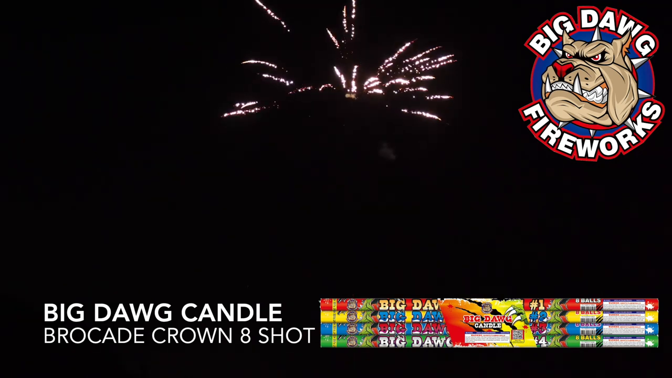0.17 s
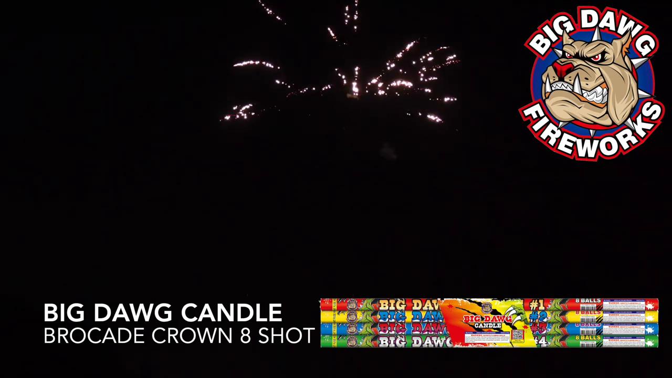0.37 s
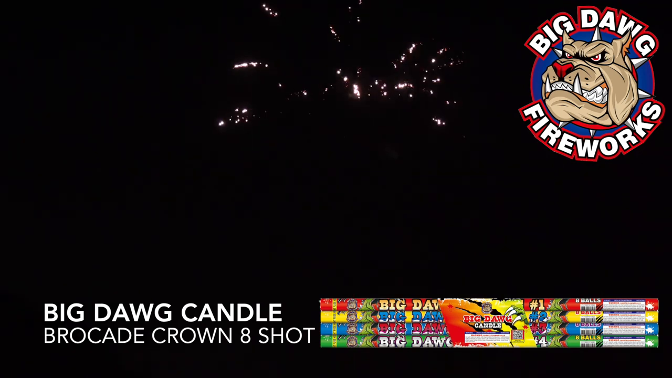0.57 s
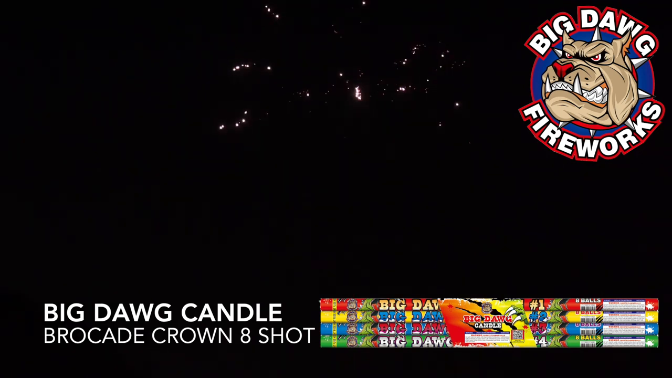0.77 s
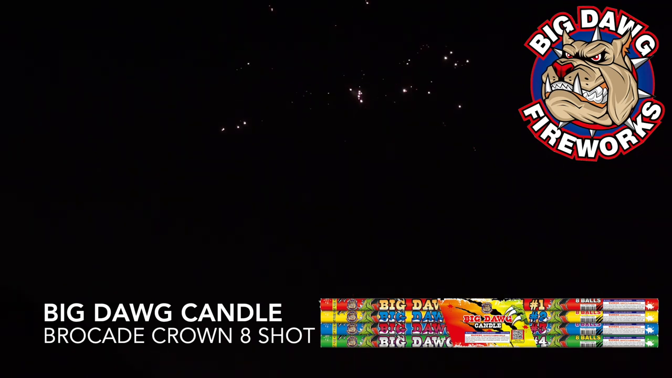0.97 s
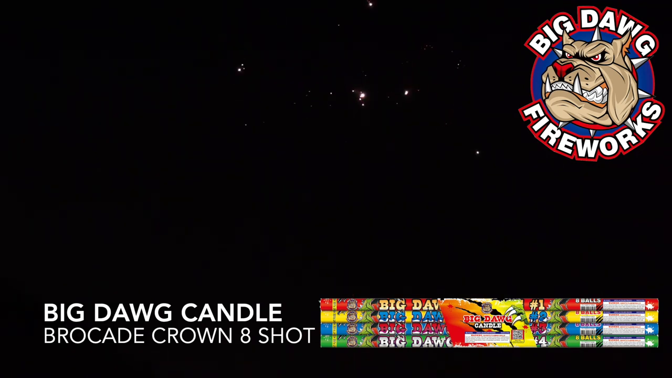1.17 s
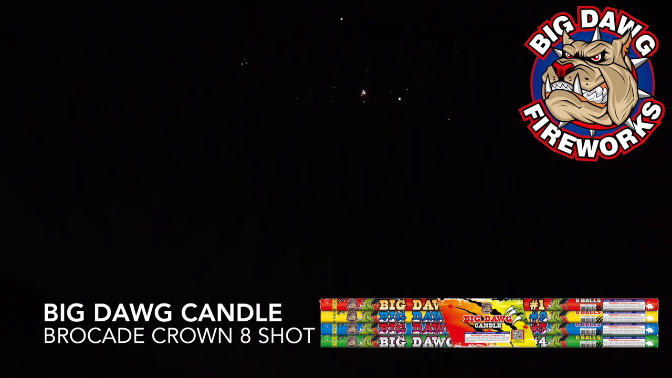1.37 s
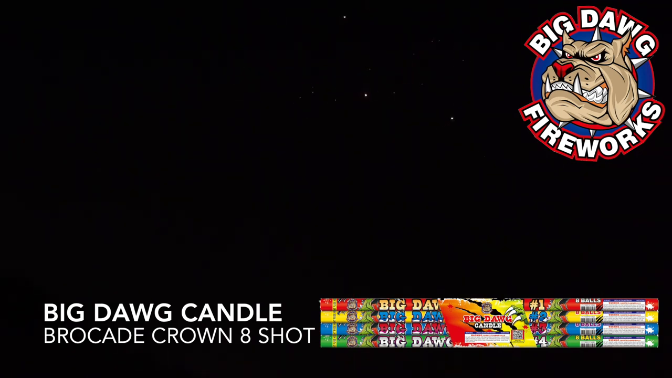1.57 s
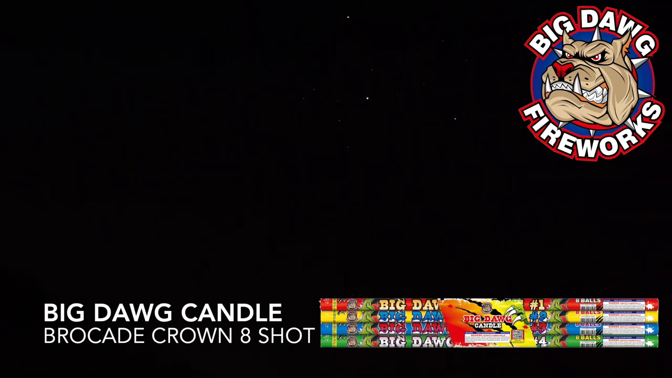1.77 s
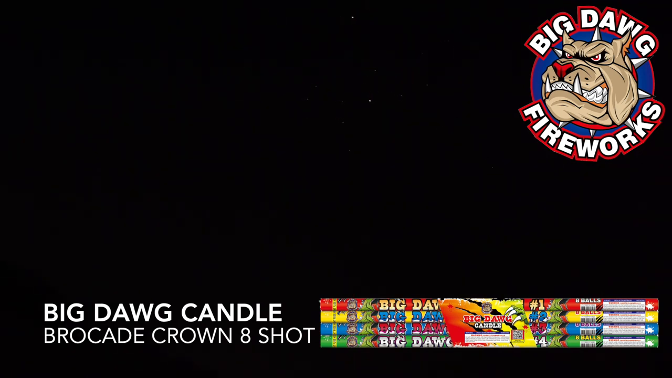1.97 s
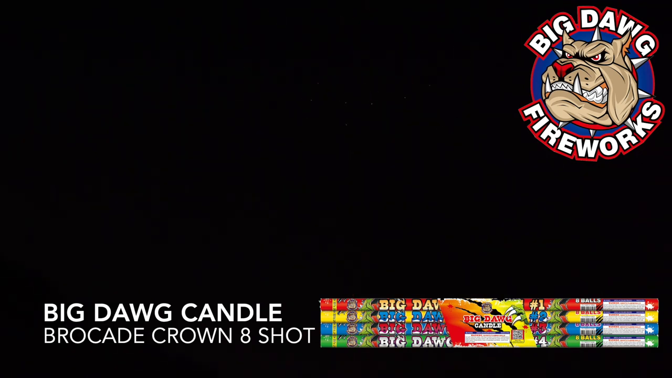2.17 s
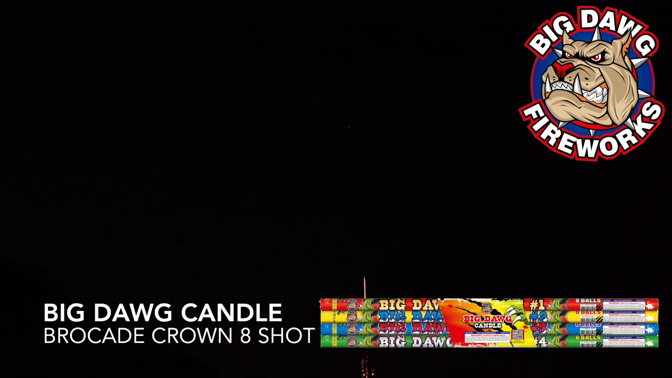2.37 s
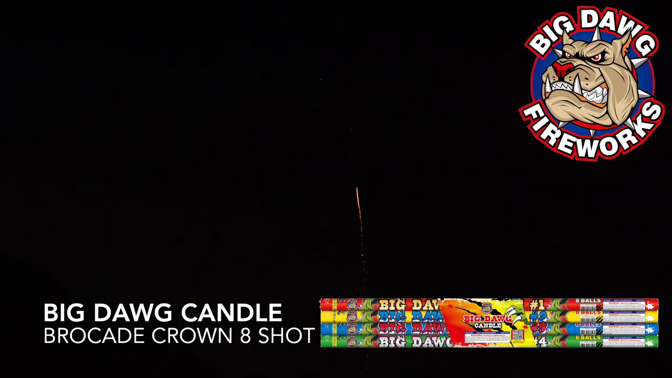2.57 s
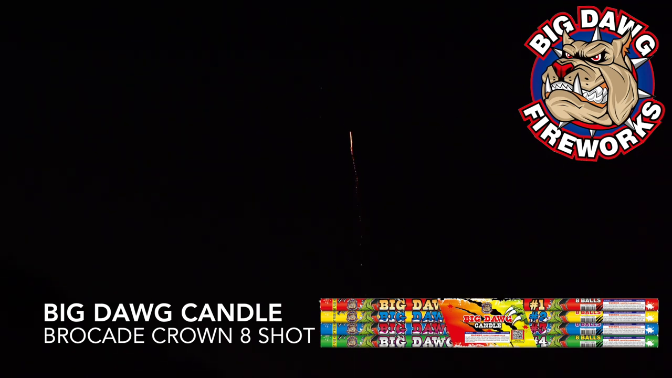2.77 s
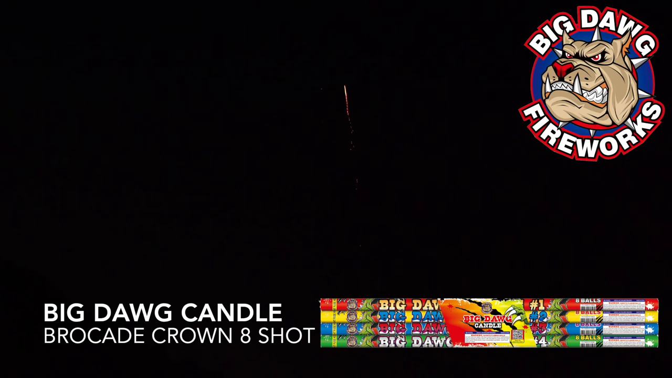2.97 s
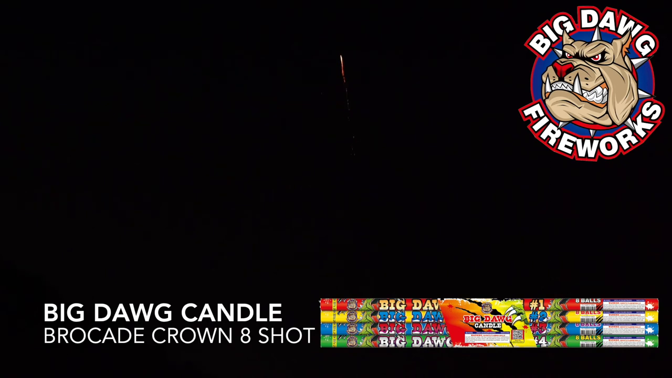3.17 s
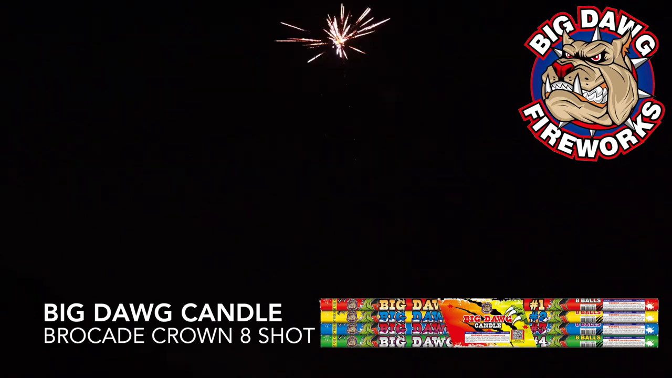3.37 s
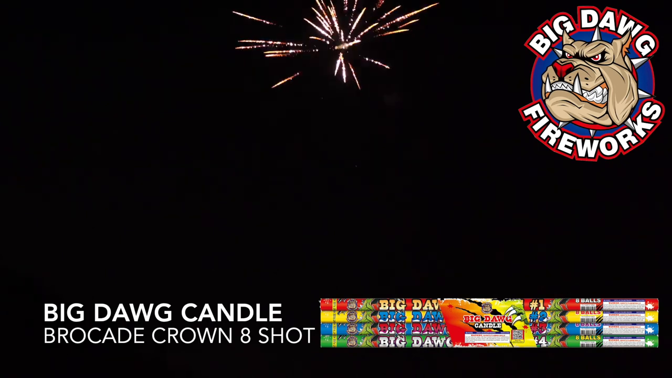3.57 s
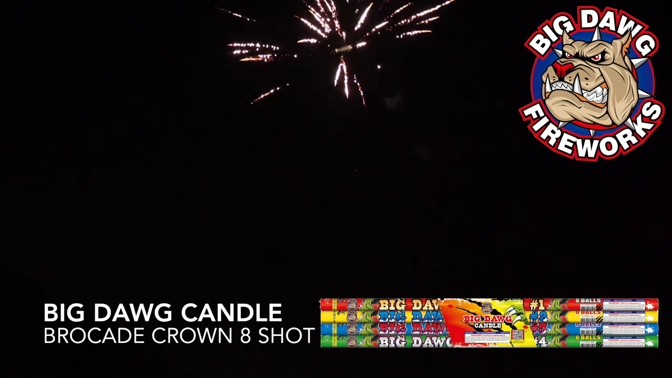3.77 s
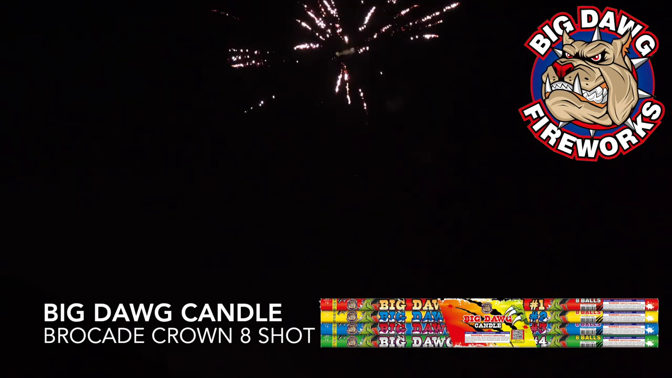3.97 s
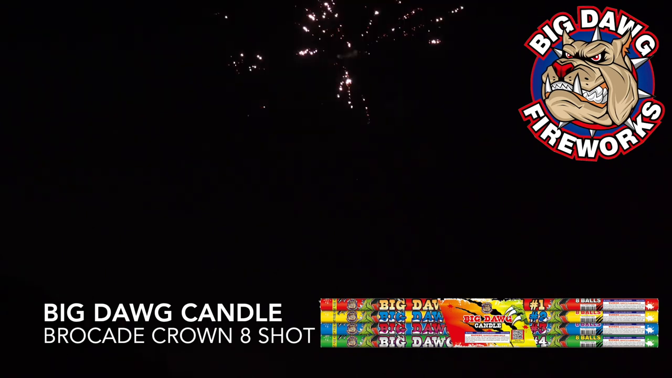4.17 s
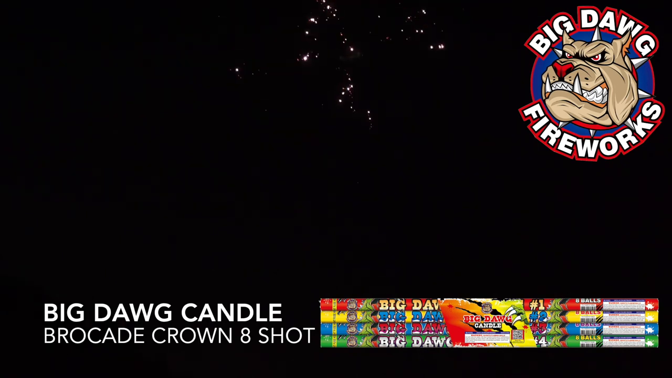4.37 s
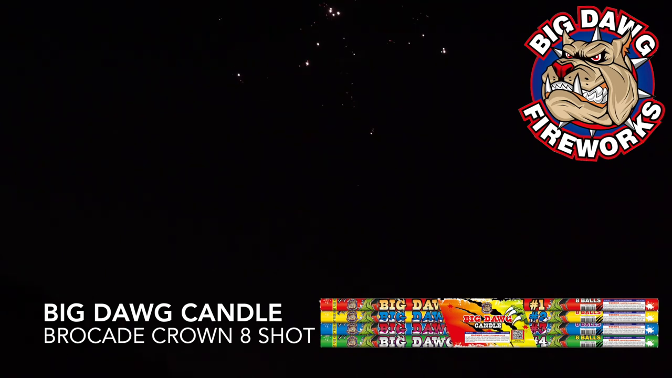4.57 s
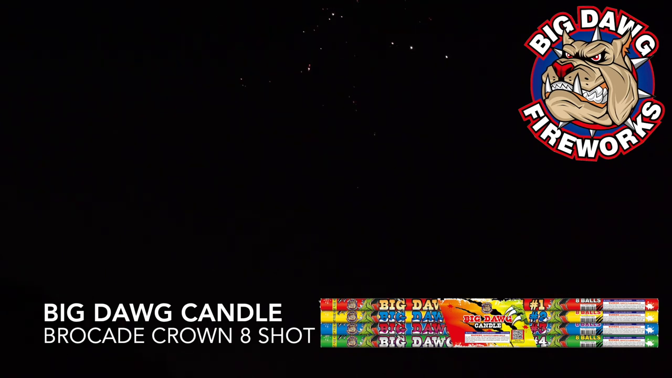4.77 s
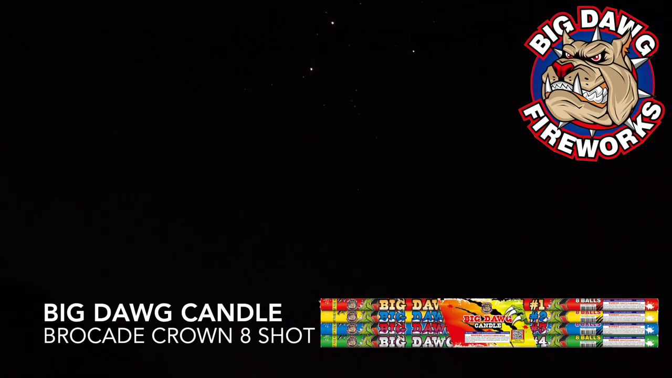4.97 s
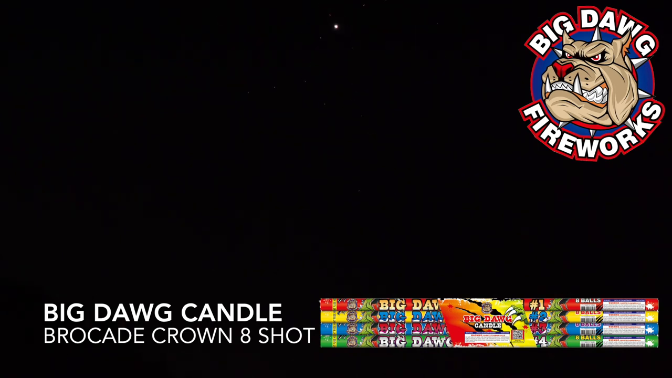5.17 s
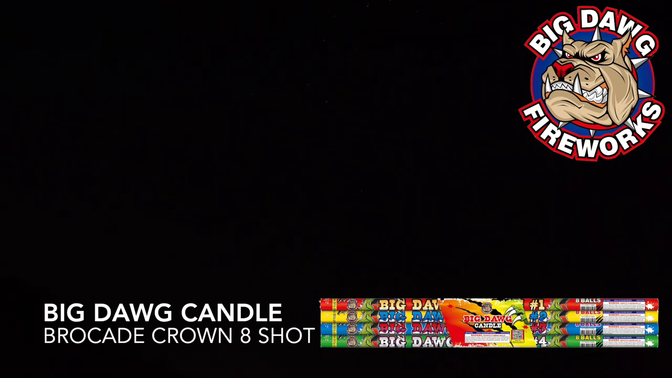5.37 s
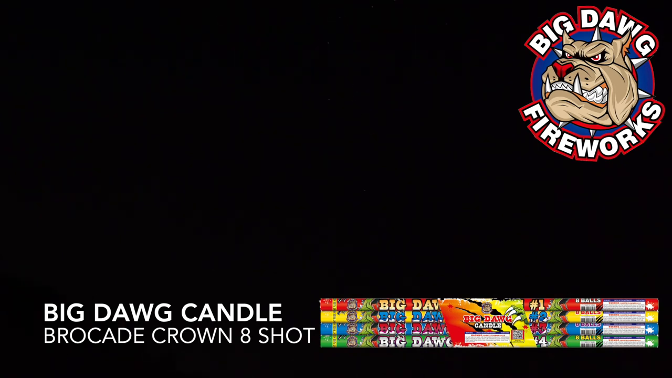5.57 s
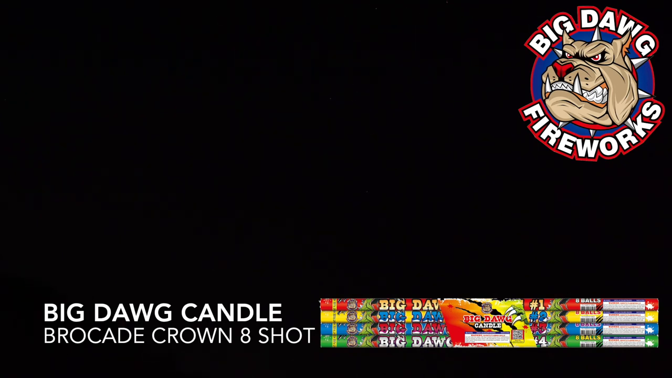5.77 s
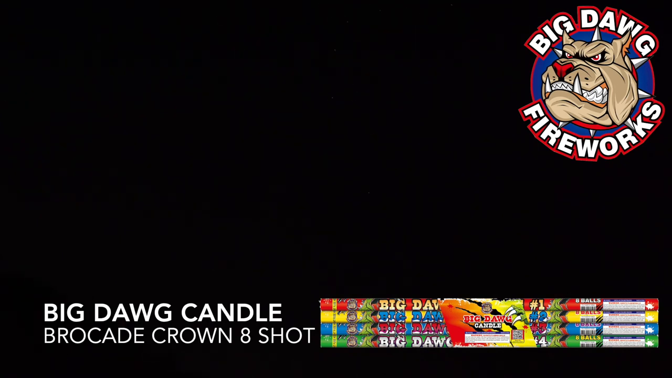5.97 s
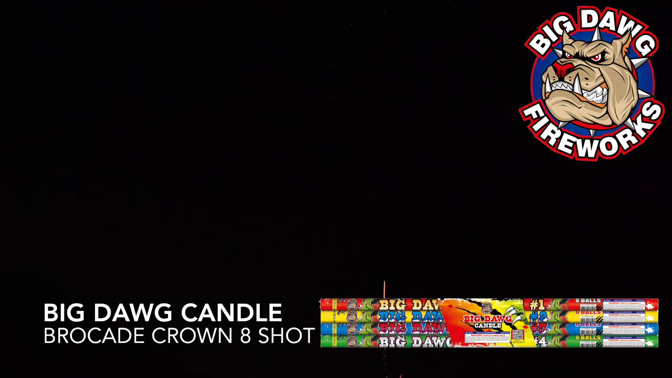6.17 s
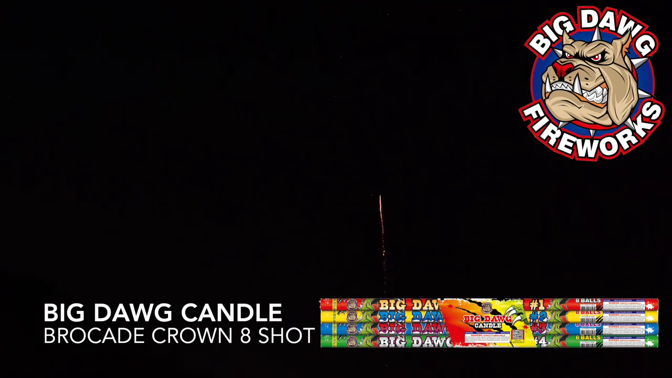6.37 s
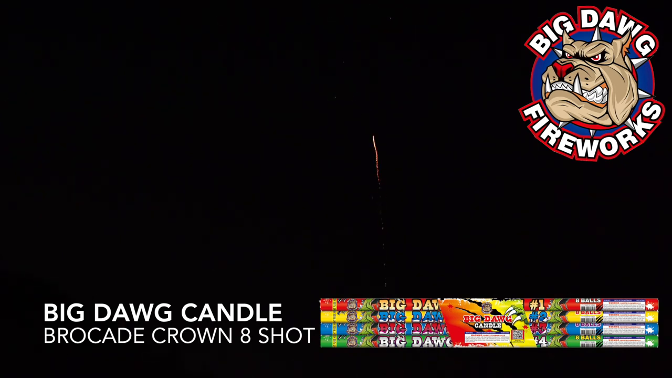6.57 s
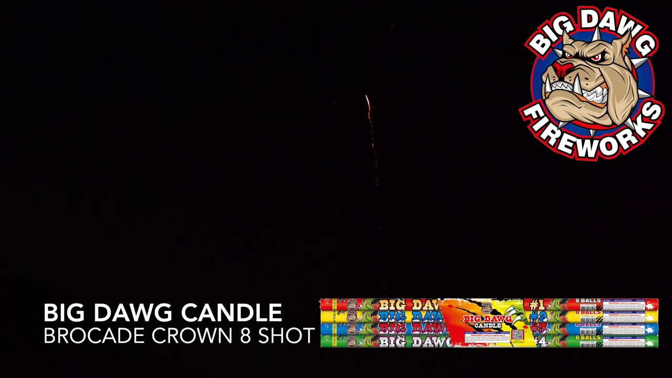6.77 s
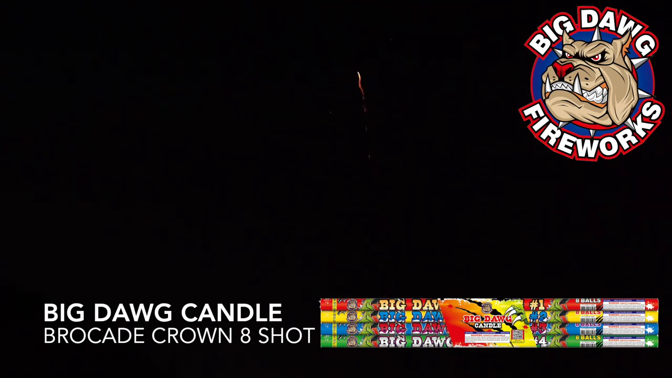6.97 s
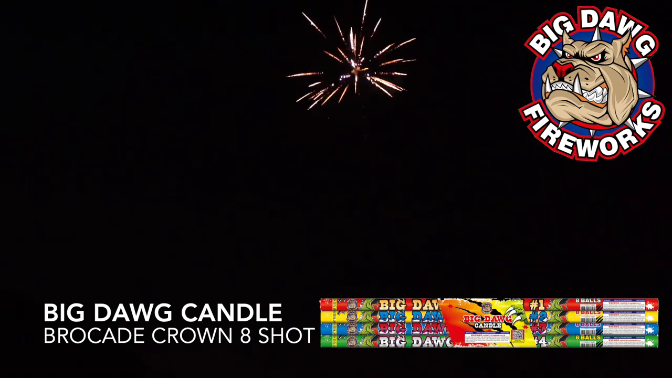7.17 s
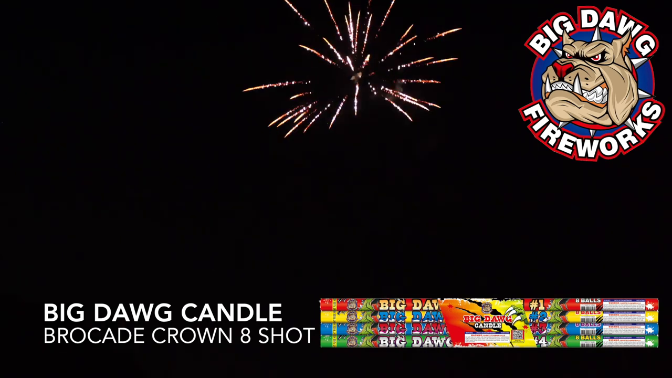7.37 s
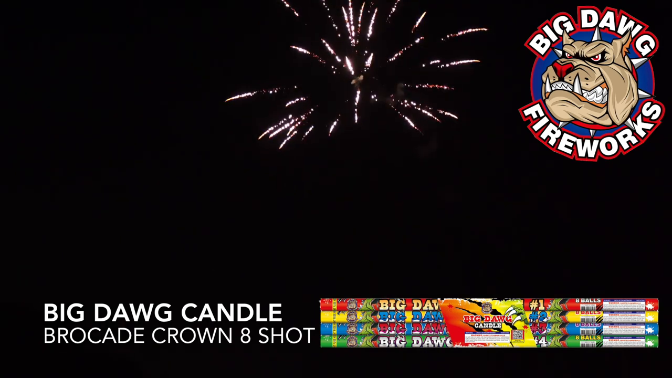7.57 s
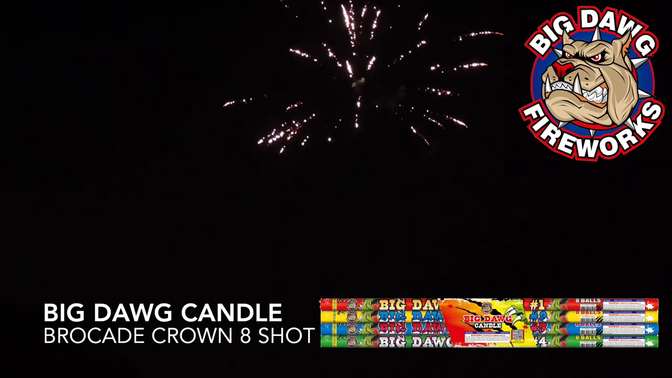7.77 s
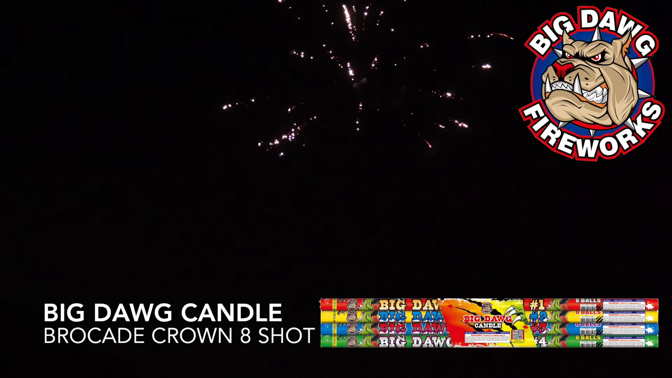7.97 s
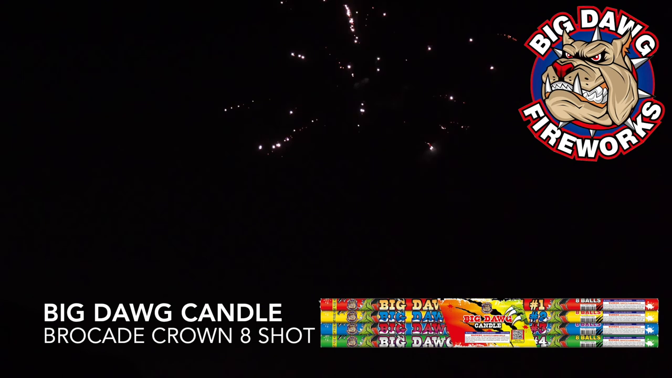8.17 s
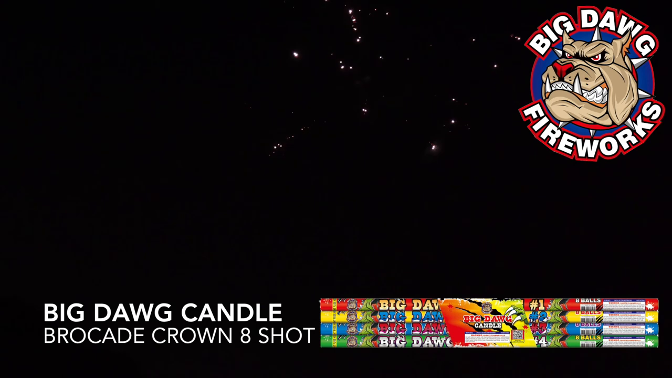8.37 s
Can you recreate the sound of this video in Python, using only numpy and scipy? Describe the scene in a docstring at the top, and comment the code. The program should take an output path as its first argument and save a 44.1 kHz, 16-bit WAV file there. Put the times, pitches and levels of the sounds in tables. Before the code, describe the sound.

At night in open country, a firework tube pops twice; loud overhead bangs crack, slap off walls and roll away through trees.

```python
"""Roman candle at night

Open country: the tube spits a shell with a sharp pop, and about a second later it bursts overhead.
Each blast is a short shock with added resonances; it slaps back from ground and buildings as duller copies,
then rolls back from the trees as a long noise hiss that dulls with distance. The loudest peaks overload.
Faint insects are throbbing noise bands and sliding tones over a steady hush; faint, late echoes of the
shots, short dull knocks and small crackles, are damped noise through resonances."""
import sys
import numpy as np
from scipy import signal
from scipy.fft import rfft, irfft, next_fast_len
from scipy.io import wavfile
from scipy.ndimage import uniform_filter1d

SR = 44100
rng = np.random.default_rng(int(sys.argv[2]) if len(sys.argv) > 2 else 0)


def store_pcm(level_fs):
    """Save levels as 16-bit WAV."""
    pcm = np.round(np.clip(level_fs, -1, 1) * 32767).astype(np.int16)
    wavfile.write(sys.argv[1], SR, np.atleast_2d(pcm).T)


N = 371763


def from_db(db):
    """Decibels to gain."""
    return 10 ** (np.asarray(db) / 20)


def at_hz(points, hz):
    """Read a spectrum on a log-frequency axis."""
    known_hz, values = np.transpose(points)
    return np.interp(np.log(np.maximum(hz, 1)), np.log(known_hz), values)


def panned(pan_db):
    """Left and right gains for a level difference; positive leans left."""
    return from_db(np.array([[0.5], [-0.5]]) * pan_db)


def butter(x, hz, kind, order=2):
    """Causal Butterworth filter."""
    sections = signal.butter(order, np.clip(hz, 10, SR * 0.49), kind, fs=SR, output="sos")
    return signal.sosfilt(sections, x)


def resonance(x, hz, width_hz):
    """Two-pole resonance with a gain of about 1 on top."""
    radius = np.exp(-np.pi * width_hz / SR)
    feedforward = np.array([1, 0, -1]) * (1 - radius ** 2) / 2
    feedback = [1, -2 * radius * np.cos(2 * np.pi * hz / SR), radius ** 2]
    return signal.lfilter(feedforward, feedback, x)


def add(out, s, sound):
    """Mix a sound in at a time in seconds, dropping what lies outside."""
    at = int(round(s * SR))
    first, last = max(at, 0), min(at + sound.shape[-1], N)
    if last > first:
        out[:, first:last] += sound[..., first - at:last - at]


def stereo(pair, likeness):
    """Turn two unrelated noises into left and right with a given likeness."""
    c = np.clip(likeness, -1, 1)
    middle = np.sqrt((1 + c) / 2) * pair[0]
    side = np.sqrt((1 - c) / 2) * pair[1]
    return middle + side * np.array([[1], [-1]])


def wander(size, rate_hz):
    """Random values of spread about 1, joined by straight lines."""
    steps = np.arange(size) / SR * rate_hz
    return np.interp(steps, np.arange(SR // 4), rng.standard_normal(SR // 4))


# Night air with an insect chorus near 8 kHz: pitch_hz, level_db_per_hz
NIGHT_AIR = [(25, -87), (100, -76.5), (250, -79.5), (420, -79), (700, -77), (1100, -81.5), (1600, -85.5),
             (3300, -94.5), (4200, -90), (5200, -99), (6800, -93), (8100, -86), (9600, -100), (15500, -102)]
# How alike left and right are: pitch_hz, likeness (1 = mono)
NIGHT_WIDTH = [(50, 0.075), (400, 0.031), (2000, 0.085), (8000, 0.34), (12000, 0.69)]


def night():
    """Steady distant hush and insect chorus: noise shaped in level and stereo width across its spectrum."""
    size = next_fast_len(N)
    hz = np.arange(size // 2 + 1) * SR / size
    noise = stereo(rfft(rng.standard_normal((2, size))), at_hz(NIGHT_WIDTH, hz))
    return irfft(noise * from_db(at_hz(NIGHT_AIR, hz)), size)[:, :N] * np.sqrt(SR / 2)


def blast(length_ms, modes, low_cut_hz, crack_db, crack_hz):
    """A shock front with a crisp edge, its suction phase and a short ring; peak 1."""
    age = np.arange(SR // 30) / SR * 1000 / length_ms
    shock = butter((age - 1) * np.exp(-age), low_cut_hz, "high", order=1)
    wave = shock + from_db(crack_db) * butter(shock, crack_hz, "high", order=1)
    for hz, width_hz, db in modes:
        wave = wave + from_db(db) * resonance(shock, hz, width_hz)
    return wave / np.abs(wave).max()


def reflect(wave, surfaces):
    """Each surface returns a duller copy of the blast, trailed by scatter from its rough parts."""
    out, t = np.zeros((2, N)), np.arange(SR // 16) / SR
    for delay_s, db, pan_db, top_hz, scatter_db, decay_s in surfaces:
        path = stereo(rng.standard_normal((2, len(t))), 0.38) * np.exp(-t / decay_s)
        path *= from_db(scatter_db) / np.sqrt(np.sum(path ** 2, axis=1, keepdims=True))
        path[:, 0] = 1   # the mirror-like front
        echo = butter(signal.fftconvolve(path, wave[None], axes=1), top_hz, "low")
        add(out, delay_s, from_db(db) * panned(pan_db) * echo)
    return out


# The longer a slap travels, the more smeared it comes back
SLAP_SMEAR_S, SLAP_SMEAR_PER_S = 0.0021, 0.0018


def slaps(wave, walls, near_top_hz, halving_s):
    """Echoes from walls; their treble limit has halved after halving_s of travel, and their scatter lengthens."""
    surfaces = []
    for delay_s, db, pan_db, scatter_db in walls:
        top_hz = near_top_hz / (1 + delay_s / halving_s)
        smear_s = SLAP_SMEAR_S + SLAP_SMEAR_PER_S * delay_s
        surfaces.append((delay_s, db, pan_db, top_hz, scatter_db, smear_s))
    return reflect(wave, surfaces)


PUFF_HZ, PUFF_WIDTH_HZ = 133, 250


def puff():
    """The gas cloud behind a blast swells and collapses: a slow, heavily damped pressure cycle; peak 1."""
    push = signal.unit_impulse(N) + 1e-18   # the tiny offset keeps the filter tail from vanishing
    wave = resonance(resonance(push, PUFF_HZ, PUFF_WIDTH_HZ), PUFF_HZ, PUFF_WIDTH_HZ)
    return wave / np.abs(wave).max()


# Groves that answer every shot from their own side: delay_s, spread_s, rise_db (before grove_share), left_right_db
TREE_GROVES = [(.118, 0.0086, 12, -7), (.21, .03, -1.5, 1.5), (.29, 0.027, 3, -2), (.4, 0.06, -2, -2.5),
               (.53, 0.014, -3, 2.5), (.625, 0.14, 3, -3.5), (.97, 0.071, 5, 6)]


def swell(reach_s, rise_db_per_s, fade_db_per_s, grove_share):
    """Gain of a rolling echo: it builds up to the tree line, fades, and shifts level and side at each grove."""
    t = np.arange(3 * SR) / SR
    level_db = np.minimum(rise_db_per_s * (t - reach_s), fade_db_per_s * (reach_s - t))
    side_db = 0
    for delay_s, spread_s, db, pan_db in TREE_GROVES:
        answering = np.exp(-((t - delay_s) / spread_s) ** 2)
        level_db = level_db + grove_share * db * answering
        side_db = side_db + pan_db * answering
    return from_db(level_db) * panned(side_db)


def patches(shape, size_hz, size_s):
    """Smooth random hills over frequency and time (256 samples a step, 512 a window); spread 1."""
    field = rng.standard_normal(shape)
    for axis, span in ((0, size_hz * 512 / SR), (1, size_s * SR / 256)):
        field = uniform_filter1d(field, max(int(span), 1), axis=axis)
    return field / field.std()


AIR_DB_PER_S_KHZ = 3.5
SURGE_DB = 1.33   # groups of trees answer in lumps, each with its own colour


def roll(gain, colour, grain_db, grain_hz, likeness, ground_db, ground_hz, ground_s):
    """Countless small echoes; later ones lose more treble to the air and more low-mid to the ground."""
    t = np.arange(3 * SR) / SR
    clumps = wander(len(t), grain_hz)
    echoes = stereo(rng.standard_normal((2, len(t))), likeness) * from_db(grain_db * clumps)
    hz, delay_s, bins = signal.stft(echoes / echoes.std(), SR, nperseg=512)
    hz = np.maximum(hz, 20)[:, None]
    air_loss_db = AIR_DB_PER_S_KHZ * delay_s * hz / 1000
    ground_band = np.exp(-np.log2(hz / ground_hz) ** 2)
    ground_loss_db = ground_db * ground_band * (1 - np.exp(-(delay_s / ground_s) ** 2))
    surges_db = SURGE_DB * patches(bins.shape, size_hz=450, size_s=0.03)
    shape_db = at_hz(colour, hz) - air_loss_db - ground_loss_db + surges_db
    sound = signal.istft(bins * from_db(shape_db), SR)[1][:, :len(t)] * np.sqrt(SR / 2)
    return sound * gain


BURST_REACH_S, BURST_RISE_DB_PER_S, BURST_FADE_DB_PER_S = 0.22, 93, 11.5
# Shell bursts, the first already rolling away: start_s, level_db, pulse_ms, slap_db, roll_db
SHELL_BURSTS = [(-.213, 12, 0.21, -0.5, 0), (3.5105, 13.5, 0.26, -0.5, 0), (7.2635, 14.5, 0.24, 0.5, 0.5)]
# The boom inside a burst: pitch_hz, width_hz, level_db
BOOM_MODES = [(159, 410, -9), (338, 44, -2.5), (673, 425, 5.5), (1045, 290, 3)]
# Direct sound and near reflections: delay_s, level_db, left_right_db, top_hz, scatter_db, scatter_decay_s
BURST_NEAR_PATHS = [(0, 10, 2, 13600, -15, 0.002), (.0017, -11, 8, 2500, -49, 0.0017),
                    (.0056, -10.5, 3, 9000, 5, 0.0016), (.0068, -27.5, -11, 940, 20, 0.0056)]
# Slaps from near and distant buildings: delay_s, level_db, left_right_db, scatter_db
BURST_WALLS = [(.0545, -31.5, -20, 1.5), (.1042, -23, -12.5, 12), (.109, -27.5, -17, 7), (.3, -20, -1, -3),
               (.56, -27, -10, -14), (.955, -26.5, 15, 2.5), (.986, -28.5, 17.5, 5.5),
               (1.754, -35.5, 13, -3), (1.945, -30.5, 8, 1.5), (2.018, -36, 8, -2), (2.299, -35, -10, 5),
               (2.378, -33, 6, 4), (2.507, -32.5, -4, 4)]
# Colour of the rolling echo before the air dulls it: pitch_hz, level_db_per_hz (before swell and roll_db)
BURST_ROLL_COLOUR = [(40, -95), (100, -66), (175, -56.5), (245, -55.5), (310, -47), (400, -51.5),
                     (650, -46.5), (1050, -49), (1500, -55.5), (1950, -56), (2600, -60), (4000, -59),
                     (6000, -64.5), (8000, -67), (10000, -72.5), (13000, -132)]


def bursts():
    """The shell bursts high up: a heavy, booming blast that reaches the whole landscape."""
    out = np.zeros((2, N))
    for s, db, length_ms, slap_db, roll_db in SHELL_BURSTS:
        wave = from_db(db) * blast(length_ms, BOOM_MODES, low_cut_hz=95, crack_db=4, crack_hz=3500)
        add(out, s, reflect(wave, BURST_NEAR_PATHS) + from_db(-18) * puff())
        add(out, s, from_db(slap_db) * slaps(wave, BURST_WALLS, near_top_hz=11000, halving_s=0.23))
        gain = swell(BURST_REACH_S, BURST_RISE_DB_PER_S, BURST_FADE_DB_PER_S, grove_share=0.69)
        rolling = roll(gain, BURST_ROLL_COLOUR, grain_db=1.5, grain_hz=130,
                       likeness=0.097, ground_db=12.5, ground_hz=268, ground_s=0.53)
        add(out, s, from_db(roll_db) * rolling)
    return out


# Faint, late echoes of the shots: start_s, pitch_hz, width_hz, decay_s, level_db (before the resonances)
LATE_ECHOES = [(.742, 4560, 1100, 0.01, -25), (3.343, 644, 400, 0.0065, -17.5),
               (5.83, 3680, 1300, .004, -32), (6.722, 3560, 400, 0.014, -27),
               (7.042, 790, 350, 0.0035, -17), (7.054, 670, 400, 0.0032, -14)]


def late_echoes():
    """Faint, late echoes of the shots, short dull knocks and small crackles: dying noise, resonated twice."""
    out, t = np.zeros((2, N)), np.arange(SR // 12) / SR
    for s, hz, width_hz, decay_s, db in LATE_ECHOES:
        noise = stereo(rng.standard_normal((2, len(t))), 0.3) * np.exp(-t / decay_s)
        add(out, s, from_db(db) * resonance(resonance(noise, hz, width_hz), hz, width_hz))
    return out


TRILL_WIDTH_HZ, TRILL_FADE_S = 134, 0.29
CHIRPS_PER_S, CHIRP_SLOWING_PER_S2, CHIRP_UNEVEN_DB = 19.8, 12.6, 1
# Thin throbbing trills: start_s, end_s, pitch_hz, level_db (before fade and throb)
TRILL_SONGS = [(.75, 1.7, 2150, -55), (1.7, 3.6, 2640, -61.5), (1.85, 3.7, 2160, -55.5),
               (4.6, 5.498, 2180, -56), (5.401, 7.4, 2615, -62), (5.7, 7.604, 2177, -55)]
# Runs of high chirps: start_s, end_s, centre_pitch_hz, level_db (before the uneven strokes)
CHIRP_RUNS = [(.775, 1.19, 5760, -59), (1.205, 1.42, 5500, -63), (1.585, 2.09, 5920, -62),
              (4.63, 5.17, 5900, -61)]


def insects(throb_hz=27, throb_depth=0.25, chirp_fall_hz=280):
    """Throbbing trills, and slowing runs of tiny chirps that each slide down in pitch."""
    out = np.zeros((2, N))
    for start, end, hz, db in TRILL_SONGS:
        t = np.arange(int((end - start) * SR)) / SR
        noise = stereo(rng.standard_normal((2, len(t))), 0.12)
        tone = resonance(resonance(noise, hz, TRILL_WIDTH_HZ), hz, TRILL_WIDTH_HZ)
        fade = np.minimum(np.minimum(t, t[::-1]) / TRILL_FADE_S, 1)
        throb = 1 + throb_depth * np.sin(2 * np.pi * throb_hz * t)
        add(out, start, from_db(db) * fade * throb * tone / tone.std())
    for start, end, hz, db in CHIRP_RUNS:
        size = int((end - start) * SR)
        chirp_rate = CHIRPS_PER_S - CHIRP_SLOWING_PER_S2 * np.arange(size) / SR
        stroke = np.cumsum(chirp_rate) / SR % 1   # 0 to 1 through each chirp
        pitch_hz = hz - chirp_fall_hz * (stroke - 0.5) + 50 * wander(size, 373)
        tone = np.sin(2 * np.pi * np.cumsum(pitch_hz) / SR)
        level = from_db(db + CHIRP_UNEVEN_DB * wander(size, 24))
        add(out, start, level * np.sin(np.pi * stroke) ** 6 * tone)
    return out


# Whistles off a ribbed wall, timed from the lift: delay_s, length_s, start_hz, end_hz, level_db (before slap_db)
RIB_WHISTLES = [(.339, .04, 3500, 2930, -39), (.336, .036, 5200, 4620, -45)]


def whistles(uneven_db=4, uneven_hz=110):
    """Echoes from a row of ribs arrive ever further apart, so their pitch falls: gliding, uneven sines."""
    out = np.zeros((2, N))
    for delay_s, length_s, start_hz, end_hz, db in RIB_WHISTLES:
        size = int(length_s * SR)
        hz = np.linspace(start_hz, end_hz, size) + uneven_hz * wander(size, 420)
        envelope = np.sin(np.linspace(0, np.pi, size)) * from_db(uneven_db * wander(size, 300))
        add(out, delay_s, from_db(db) * envelope * np.sin(2 * np.pi * np.cumsum(hz) / SR))
    return out


LEAK_S = 0.0094   # gas escapes for this long before the pop


def gas_leak():
    """Gas blows past the shell just before it leaves the tube: a growing band of noise."""
    size = int(LEAK_S * SR)
    leak = butter(rng.standard_normal(size), 1580, "low") * np.linspace(0, 1, size) ** 3.2
    return from_db(0.5) * butter(leak, 740, "high")


LIFT_REACH_S, LIFT_RISE_DB_PER_S, LIFT_FADE_DB_PER_S = 0.1, 158, 16.5
# The dip in a pop's colour: share removed, width as a share of its frequency
HOLLOW_DEPTH, HOLLOW_WIDTH = 0.7, 0.54
# Lift charges: start_s, level_db, pulse_ms, tube_ring_hz, ring_db, hollow_hz, puff_db, slap_db, roll_db,
# roll_body_db, extra_fade_db_per_s
LIFT_CHARGES = [(2.3676, 1, 0.22, 1680, 13.5, 2660, -16, 7, -1, 3, -0.5),
                (6.1507, 4, 0.23, 1680, 0, 870, -14.5, 2, -1.5, 0, 4)]
# The tube's answer besides its main ring: pitch_hz, width_hz, level_db
TUBE_RESONANCES = [(480, 350, -8), (1216, 550, 10.5), (3740, 2600, 9.5), (5700, 900, 7)]
# The broader, lower voice that spreads over the field: pitch_hz, width_hz, level_db
FIELD_RESONANCES = [(895, 930, 7), (3370, 3800, -0.5)]
# Direct sound, the ground and the wall that faces the tube: delay_s, level_db, left_right_db, top_hz,
# scatter_db, scatter_decay_s
LIFT_NEAR_PATHS = [(0, 9.5, -2, 12200, -3.5, 0.0014), (.0011, -1, -3, 3040, -30, 0.0041),
                   (.0085, -20, 18, 6000, 2, 0.0022), (0.1183, -10, -10, 9900, 0.5, 0.0018)]
# Slaps from fences and walls: delay_s, level_db, left_right_db, scatter_db
LIFT_WALLS = [(0.0282, -18.5, -4, 0), (0.054, -8.5, -4, -2.5), (0.0857, -21.5, 4, 3), (.2565, -23, -8, -6),
              (0.2807, -5, -7.5, 0), (0.2816, -14.5, 8, -8), (0.2933, -20, 4, 0), (.386, -22.5, -19.5, -7),
              (.578, -30, 0, -4), (.681, -29, 14, -2), (0.896, -43, -3, 0), (.975, -35, 14, 8)]
# Colour of the rolling echo before the air dulls it: pitch_hz, level_db_per_hz (before body, swell and roll_db)
LIFT_ROLL_COLOUR = [(40, -76.5), (160, -59), (300, -64), (550, -61.5), (1100, -60), (2000, -62.5),
                    (3000, -65), (5000, -66.5), (8000, -70.5), (10000, -81.5), (13000, -149)]


def lifts():
    """The lift charge pops out of the tube, close to the ground: a ringing shock with a hollow in its colour."""
    out = np.zeros((2, N))
    for (s, db, length_ms, ring_hz, ring_db, hollow_hz, puff_db,
         slap_db, roll_db, body_db, fade_db) in LIFT_CHARGES:
        modes = TUBE_RESONANCES + [(ring_hz, 350, ring_db)]
        pop = from_db(db) * blast(length_ms, modes, low_cut_hz=330, crack_db=-33, crack_hz=3500)
        pop = pop - HOLLOW_DEPTH * resonance(pop, hollow_hz, HOLLOW_WIDTH * hollow_hz)
        add(out, s - LEAK_S, gas_leak())
        add(out, s, reflect(pop, LIFT_NEAR_PATHS) + from_db(puff_db) * puff())
        spreading = blast(length_ms, FIELD_RESONANCES, low_cut_hz=92, crack_db=2, crack_hz=4000)
        returns = slaps(spreading, LIFT_WALLS, near_top_hz=9500, halving_s=0.3) + whistles()
        add(out, s, from_db(slap_db) * returns)
        # a fuller charge sends more midrange out to the trees
        colour = [(hz, level + body_db * np.exp(-np.log2(hz / 900) ** 2)) for hz, level in LIFT_ROLL_COLOUR]
        gain = swell(LIFT_REACH_S, LIFT_RISE_DB_PER_S, LIFT_FADE_DB_PER_S + fade_db, grove_share=0.47)
        rolling = roll(gain, colour, grain_db=2.0, grain_hz=453.5,
                       likeness=0.29, ground_db=26, ground_hz=250, ground_s=0.86)
        add(out, s, from_db(roll_db) * rolling)
    return out


def scene():
    """Shots over the night background; they reach the left channel two samples earlier."""
    left, right = lifts() + bursts()
    shots = np.array([left, np.pad(right, (2, 0))[:N]])
    return shots + late_echoes() + night() + insects()


CUTOFF_HZ = 15950


def record(dry):
    """The blasts overload the microphone and flatten just below full scale; the top is cut."""
    flattened = dry / (1 + np.abs(dry / 0.93) ** 8) ** (1 / 8)
    return signal.sosfilt(signal.ellip(14, 0.1, 100, CUTOFF_HZ, fs=SR, output="sos"), flattened)


dry = scene()
out = record(dry)
store_pcm(out)
```